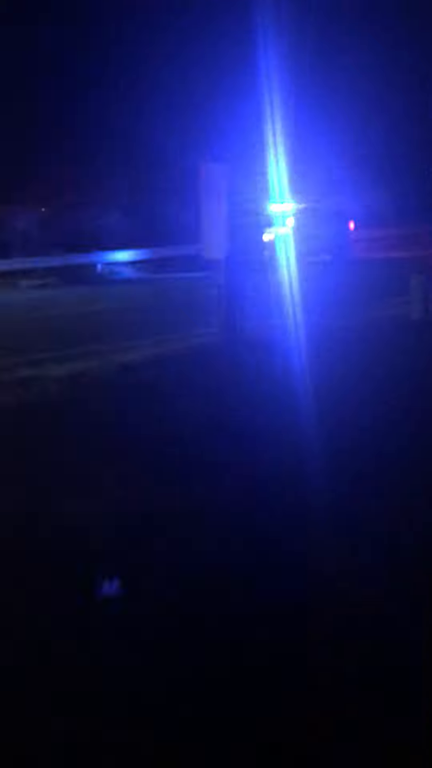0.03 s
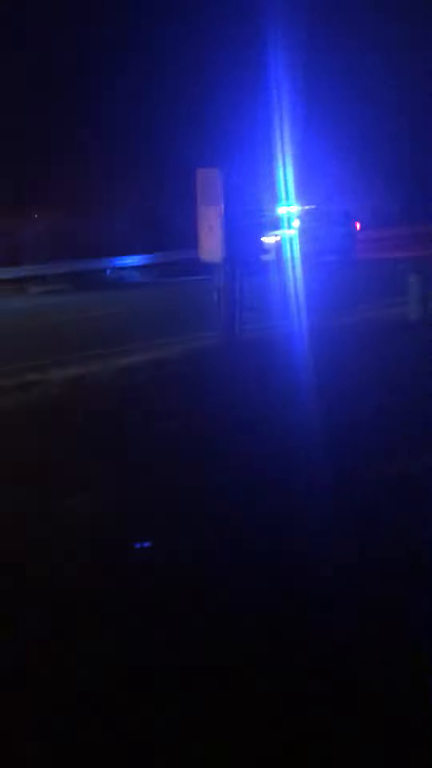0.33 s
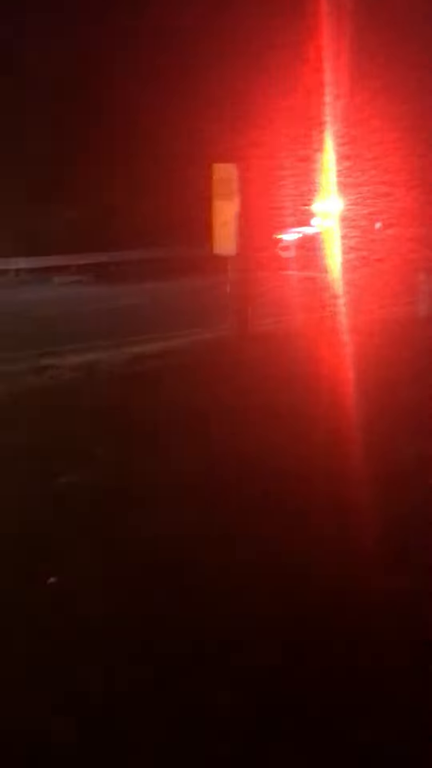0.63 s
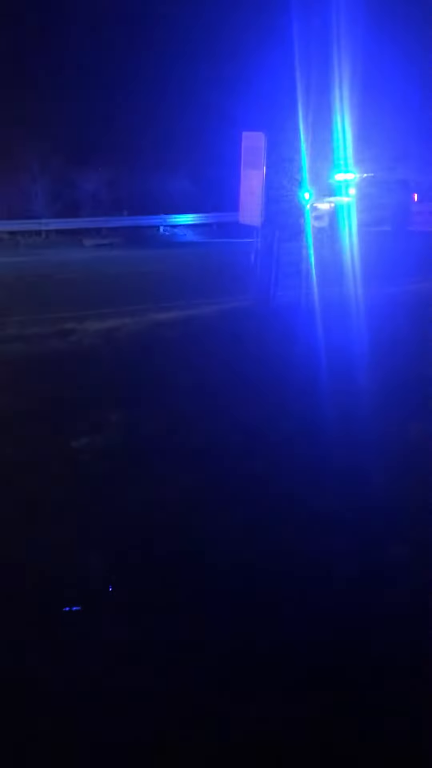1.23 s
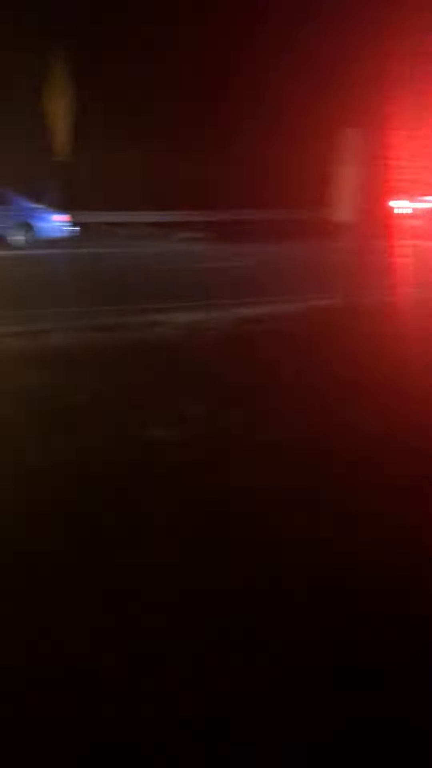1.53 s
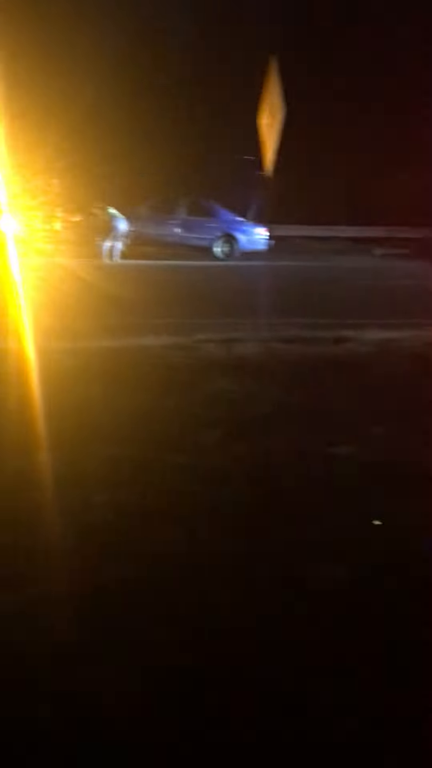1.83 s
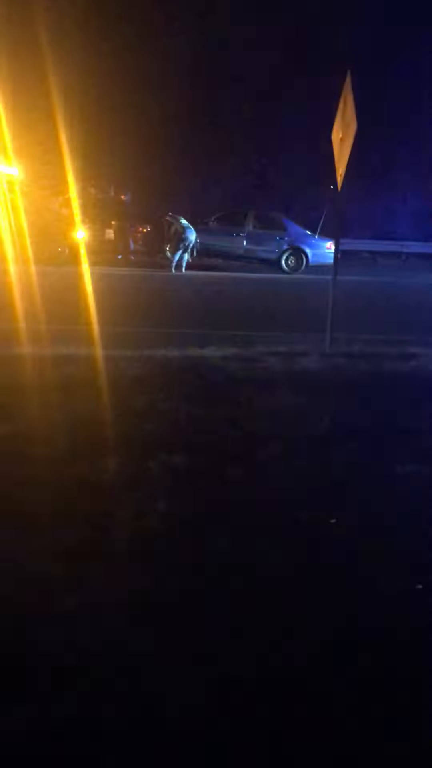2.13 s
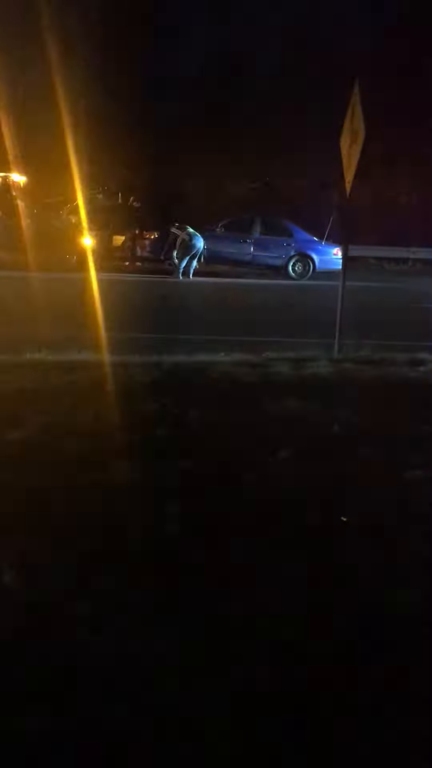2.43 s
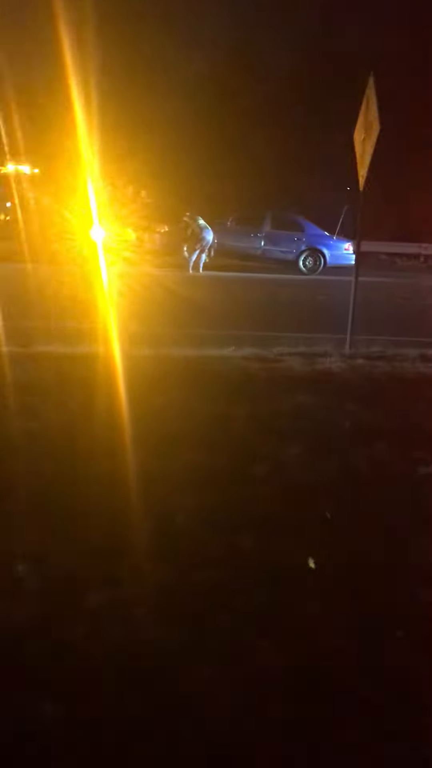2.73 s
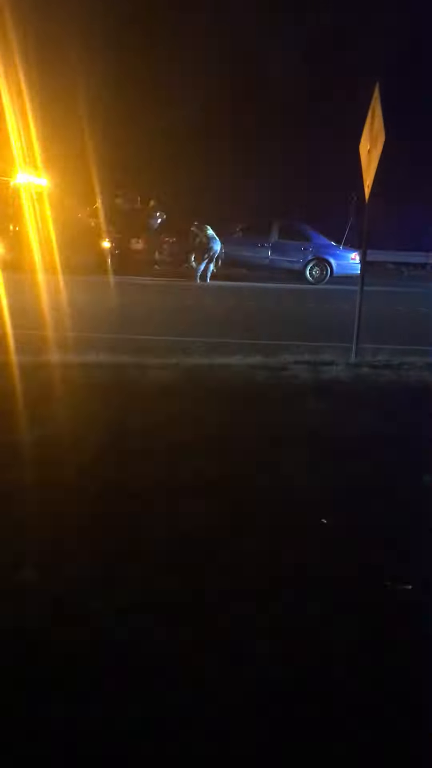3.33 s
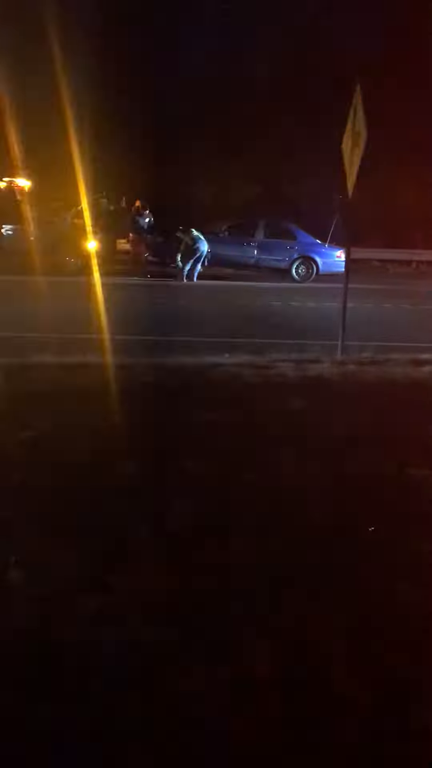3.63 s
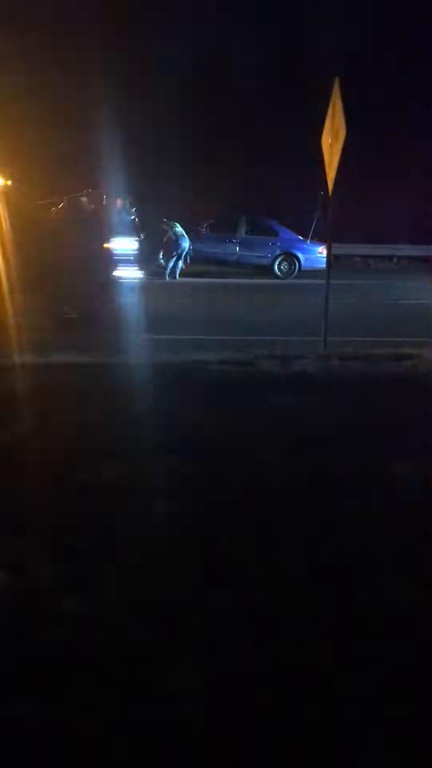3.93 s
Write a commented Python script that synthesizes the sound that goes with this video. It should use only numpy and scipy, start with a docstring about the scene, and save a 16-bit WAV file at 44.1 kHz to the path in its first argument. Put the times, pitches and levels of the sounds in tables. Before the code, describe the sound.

Vehicles idle with a low rumble as another draws near and something small clicks in pairs.

```python
"""A low rumble and a faint metallic whine: vehicles idle on a highway shoulder at night, with far traffic,
faint hiss and a brief brush of cloth. A vehicle draws near: the partials of its exhaust drone swell and
sink in pitch, and the broadband roar of its tyres rises. Close by a small sprung latch is worked over and
over, a pair of rasping clicks, then a pair of sharp snaps; each contact is a burst of chatter that
excites the damped modes of its small parts."""
import sys
import numpy as np
from scipy import signal
from scipy.fft import rfft, irfft
from scipy.io import wavfile

SR = 44100
rng = np.random.default_rng(int(sys.argv[2]) if len(sys.argv) > 2 else 0)


def output_pcm(signal):
    """Save a mono or channel-first signal as 16-bit PCM at the path in sys.argv[1].

    Samples are clipped to [-1, 1] before scaling.
    """
    pcm = np.clip(np.atleast_2d(signal).T, -1, 1) * 32767
    wavfile.write(sys.argv[1], SR, np.round(pcm).astype(np.int16))


N = 176400
T = np.arange(N) / SR


# The latch engaging. Each row: start in seconds, relative level in dB, length of the rasp in seconds.
RASP_CLICKS = [(1.2076, -42, 0.0031), (1.3101, -38.5, 0.0035), (1.7886, -40, 0.0065), (1.8776, -40, 0.008),
               (2.3744, -35.5, 0.0024), (2.4336, -38, 0.0041), (2.9110, -38.5, 0.0044),
               (2.9756, -40, 0.0065), (3.5100, -36, 0.0033), (3.5770, -38, 0.0045)]
# Its contact noise. Each row: frequency in Hz, relative spectral density in dB.
RASP_SPECTRUM = [(1500, -14), (3400, -1), (6300, 4), (7600, -6), (8600, 3), (10700, -4.5), (12000, 2),
                 (14500, -1.5), (16000, -6.5)]
# Its modes when engaged. Each row: frequency in Hz, relative level in dB, time to fall 60 dB in seconds.
ENGAGED_MODES = [(3340, -12, 0.04), (6100, -9.5, 0.036), (8600, -10, 0.019), (10150, -12.5, .03),
                 (11780, -5, 0.033), (13450, -13, 0.04), (13950, -7, .04), (14600, -8, .045)]

def latch_rasps():
    """Contact excitation: the latch engages with a rasp of chatter that sets its parts ringing."""
    return from_db(0.5) * contacts(RASP_CLICKS, RASP_SPECTRUM, ENGAGED_MODES, t60_s=0.064, ring_db=-4.5)


# Snaps and light ticks. Each row: start in seconds, relative level in dB, contact time in seconds.
SNAP_CLICKS = [(1.5008, -31, 0.003), (1.5277, -25.5, 0.0015), (1.5610, -47, .002), (1.6345, -45.5, 0.0045),
               (2.1049, -29.5, 0.0024), (2.1371, -28.5, 0.0015), (2.6040, -46, 0.0052),
               (2.6489, -24.5, 0.001), (2.6793, -29.5, 0.0024), (3.1735, -42, .002),
               (3.2235, -28.5, 0.0025), (3.2545, -31.5, 0.0036), (3.8226, -30, 0.0018),
               (3.8635, -37, 0.0049)]
# Their contact noise. Each row: frequency in Hz, relative spectral density in dB.
SNAP_SPECTRUM = [(1500, -9), (3400, -2.5), (5600, 3.5), (7700, -4), (8800, -1.5), (12500, -2.5),
                 (14700, 4.5), (16000, 3.5)]
# Modes when released. Each row: frequency in Hz, relative level in dB, time to fall 60 dB in seconds.
RELEASED_MODES = [(4570, -10, 0.028), (5740, -8.5, 0.035), (7140, -4.5, 0.074), (13400, -15, .04),
                  (13930, -6.5, .04), (14600, -6, 0.052), (14800, -16, .047)]

def latch_snaps():
    """Impact excitation: the latch springs back, and the quick decay of its chatter makes a sharp snap."""
    return from_db(-1.5) * contacts(SNAP_CLICKS, SNAP_SPECTRUM, RELEASED_MODES, t60_s=0.028, ring_db=-9)


def contacts(clicks, spectrum, modes, t60_s, ring_db):
    """Exponential decay: each burst of chatter dies fast, rings the parts and scatters off things nearby."""
    attack_s, crack_s, crack_db = 0.0012, 0.00082, 1
    scatter_db, scatter_t60_s = -14, 0.14
    burst, scatter = np.zeros(N), np.zeros(N)
    for start, db, length in clicks:
        decay_time = np.maximum(T - start - length, 0)
        onset = from_db(db) * np.clip((T - start) / attack_s, 0, 1)
        # The first contact stands out of the chatter.
        crack = 1 + from_db(crack_db) * np.exp(-np.minimum(np.abs(T - start) / crack_s, 20))
        burst += onset * crack * from_db(-60 * np.minimum(decay_time / t60_s, 2))
        scatter += onset * from_db(scatter_db - 60 * np.minimum(decay_time / scatter_t60_s, 2))
    rings = ringing_parts(burst * rng.standard_normal(N), clicks, modes)
    chatter = rms_one(noise(spectrum) * from_db(1.55 * drift(500)))
    return burst * chatter + scatter * noise(spectrum) + from_db(ring_db) * rings


def ringing_parts(force, clicks, modes):
    """Modal superposition: the grip shifts between clicks, so each mode varies in pitch and strength."""
    longest_ring_s, level_spread_db, pitch_spread = 0.15, 2.5, 0.006
    rings = np.zeros(N)
    starts = sorted(int(s * SR) for s, _, _ in clicks)
    for start, following in zip(starts, starts[1:] + [N]):
        span = np.arange(start, min(start + int(longest_ring_s * SR), N))
        push = force[span] * (span < following)
        for (hz, db, t60_s), (shift, strength) in zip(modes, rng.standard_normal((len(modes), 2))):
            gain = from_db(db + level_spread_db * strength)
            rings[span] += gain * damped_mode(push, hz * (1 + pitch_spread * shift), t60_s)
    return rings


def damped_mode(force, hz, t60_s):
    """A damped harmonic oscillator, scaled so that every mode takes the same energy from a white force."""
    radius = from_db(-60 / (t60_s * SR))
    angle = 2 * np.pi * hz / SR
    gain = np.sin(angle) * np.sqrt(2 * (1 - radius ** 2))
    return signal.lfilter([0, gain], [1, -2 * radius * np.cos(angle), radius ** 2], force + 1e-18)


# The approaching engine. Each row: time in seconds, firing cycle rate in Hz, relative level in dB.
ENGINE_APPROACH = [(0, 36.67, -47.5), (1.1, 37.02, -45.5), (1.35, 36.74, -40.5), (1.8, 36.38, -40),
                   (2.03, 36.3, -36), (2.55, 35.37, -34.5), (2.9, 34.28, -35), (3.4, 33.4, -35),
                   (3.8, 32.47, -34.5), (4, 32.46, -31)]
# Its partials. Each row: multiple of the cycle rate, relative level in dB when far, and when near.
EXHAUST_ORDERS = [(3, -13.5, -5.5), (5, -11, -10.5), (6, 1.5, -1.5), (7.8, -10, -3.5)]
# The exhaust roar. Each row: frequency in Hz, relative spectral density in dB.
EXHAUST_SPECTRUM = [(25, -38), (90, -18), (125, -8.5), (160, -3), (205, 2), (240, -3), (275, -3),
                    (330, -7.5), (500, -15), (1000, -30), (4000, -53)]

def approaching_exhaust():
    """Engine orders: partials at multiples of the firing cycle sink together as the vehicle nears."""
    cycle_hz, level_db = in_time(ENGINE_APPROACH)
    near = (cycle_hz.max() - cycle_hz) / (np.ptp(cycle_hz) + 1e-6)  # 0 at highest pitch, 1 at lowest
    jitter_hz = 1.157 + 6.1 * near ** 2
    partials = np.zeros(N)
    for order, far_db, near_db in EXHAUST_ORDERS:
        gain = from_db(far_db + near * (near_db - far_db))
        partials += gain * tone(order * cycle_hz, jitter_hz, waver_db=2.5, rate_hz=9.46)
    roar = from_db(-4.5 + 4.5 * near) * noise(EXHAUST_SPECTRUM)
    return from_db(level_db) * (partials + roar)


# The swell of the tyres' roar and of their hiss. Each row: time in seconds, level in dB.
ROAR_LEVEL = [(0, -54), (1.6, -52), (2.2, -45.5), (2.65, -42), (3.05, -35.5), (3.3, -35), (3.55, -34),
              (3.85, -36), (4, -38)]
HISS_LEVEL = [(0, -91), (2.7, -73), (3.3, -50.5), (4, -47)]
# The colour of each. Each row: frequency in Hz, relative spectral density in dB.
ROAR_SPECTRUM = [(100, -31), (350, -3), (500, -7.5), (780, 3), (1150, -3.5), (1700, -12.5), (2600, -22.5),
                 (5500, -28), (9000, -45), (16000, -47)]
HISS_SPECTRUM = [(500, -30), (1800, 10.5), (3000, 0.5), (5700, -10), (8000, -15.5), (16000, -24)]

def approaching_tyres():
    """Broadband rolling noise: the roar grows on approach, and treble joins as the tyres come abreast."""
    roar = from_db(in_time(ROAR_LEVEL)[0]) * noise(ROAR_SPECTRUM)
    hiss = from_db(in_time(HISS_LEVEL)[0]) * noise(HISS_SPECTRUM)
    return roar + hiss


# The rumble of idling engines. Each row: time in seconds, level in dB.
IDLE_LEVEL = [(0, -38.5), (.25, -37), (.5, -40), (1.25, -37.5), (2.15, -36), (2.75, -39), (3.7, -37)]
# Its colour. Each row: frequency in Hz, relative spectral density in dB.
IDLE_SPECTRUM = [(20, -46), (32, -17), (48, -2.5), (68, -0.5), (90, -1), (120, 0.5), (160, -4.5),
                 (210, -4.5), (300, -9.5), (450, -21), (1500, -52)]
# Belts and pulleys. Each row: frequency in Hz, starting level in dB, fade in dB/s (negative grows).
WHINE_PARTIALS = [(3223, -65, 0), (3273, -69.5, -1), (3963, -62, 0.8), (5160, -74, 0), (5260, -69.5, -0.5)]

def idling_vehicles():
    """Periodic excitation: firing gives a lumpy note in the rumble; belts and pulleys give a thin whine."""
    firing = from_db(-6) * tone(72.26, jitter_hz=2.3, waver_db=5.5, rate_hz=5.2)
    whine = sum(from_db(db - fade * T) * tone(hz, jitter_hz=17.4, waver_db=2.0, rate_hz=55.8)
                for hz, db, fade in WHINE_PARTIALS)
    rumble = from_db(in_time(IDLE_LEVEL)[0]) * (firing + noise(IDLE_SPECTRUM))
    return whine + rumble


# Steady wash of far traffic and faint hiss, as coloured by the microphone (dips at 7.6 and 10.4 kHz).
# Each row: frequency in Hz, relative spectral density in dB.
TRAFFIC_AND_HISS_SPECTRUM = [(100, -21), (450, -12.5), (680, 0), (950, 0.5), (1500, -5), (2200, -16.5),
                             (3500, -22.5), (5500, -27.5), (7600, -36), (8700, -33.5), (10400, -43.5),
                             (11500, -39), (14200, -38), (16000, -42)]

def far_traffic_and_hiss():
    """Incoherent summation: far traffic and faint hiss merge into one noise, coloured by the microphone."""
    return from_db(-40.5) * noise(TRAFFIC_AND_HISS_SPECTRUM)


# A sleeve brushing close by. Each row: time in seconds, mean level in dB.
SLEEVE_LEVEL = [(0, -61), (.11, -66), (.17, -55), (.2, -73), (.5, -92)]

def sleeve_brush():
    """Friction noise: cloth gives a brief, flickering hiss with the same colour as the latch's rasp."""
    flicker_db = 2 * drift(60)
    return from_db(in_time(SLEEVE_LEVEL)[0] + flicker_db) * noise(RASP_SPECTRUM)


def tone(hz, jitter_hz, waver_db, rate_hz):
    """Random frequency and amplitude modulation: an unsteady machine tone of unit rms."""
    cycles = np.cumsum(hz + jitter_hz * drift(rate_hz)) / SR
    phase = 2 * np.pi * (cycles + rng.random())
    return rms_one(np.sin(phase) * from_db(waver_db * drift(rate_hz)))


def noise(spectrum):
    """Spectral shaping: white noise takes on a given colour, at unit rms."""
    hz, db = np.transpose(spectrum)
    bin_hz = np.arange(N // 2 + 1) * SR / N + 1e-3
    gain = from_db(np.interp(np.log(bin_hz), np.log(hz), db))
    gain /= np.hypot(1, (bin_hz / hz[-1] / 2) ** 2)  # rolls off from an octave above the last row
    return rms_one(irfft(rfft(rng.standard_normal(N)) * gain, N))


def drift(rate_hz):
    """Low-pass filtered noise: a random fluctuation of unit rms, mostly slower than rate_hz."""
    hop, settling = 40, 2000
    pole = np.exp(-2 * np.pi * rate_hz * hop / SR)
    white = rng.standard_normal(N // hop + settling + 2)
    slow = signal.lfilter([1], [1, -2 * pole, pole ** 2], white)[settling:]
    return np.interp(np.arange(N) / hop, np.arange(len(slow)), rms_one(slow))


def in_time(rows):
    """Linear interpolation: each column of a curve at every sample."""
    seconds, *columns = np.transpose(rows)
    return [np.interp(T, seconds, column) for column in columns]


def from_db(db):
    """Decibels to amplitude ratio."""
    return 10 ** (np.asarray(db) / 20)


def rms_one(x):
    """Normalisation to unit rms."""
    return x / np.sqrt(np.mean(x ** 2) + 1e-20)


def scene():
    """Linear superposition: the latch, the vehicles, the hiss and the cloth add in one channel."""
    latch = latch_rasps() + latch_snaps()
    vehicles = idling_vehicles() + approaching_exhaust() + approaching_tyres()
    return (latch + vehicles + far_traffic_and_hiss() + sleeve_brush())[None]


def record(dry):
    """Band limiting: a steep elliptic low-pass filter cuts the highest treble."""
    cutoff_hz = 15750
    return signal.sosfilt(signal.ellip(12, .2, 80, cutoff_hz, fs=SR, output="sos"), dry)


dry = scene()
out = record(dry)
output_pcm(out)
```